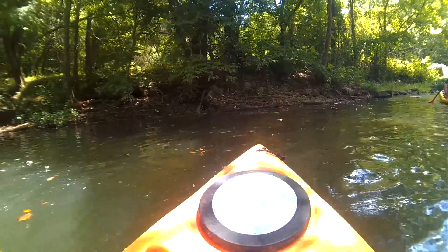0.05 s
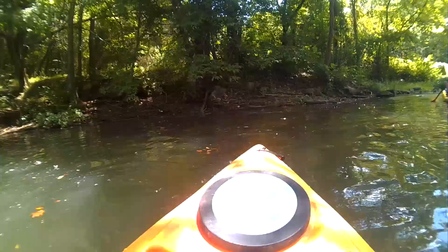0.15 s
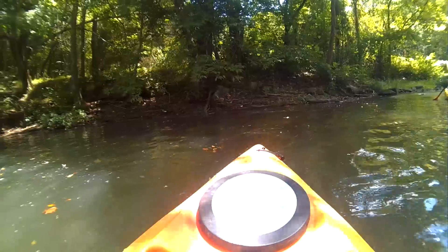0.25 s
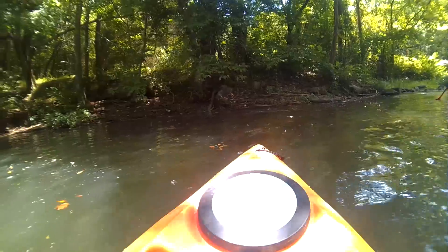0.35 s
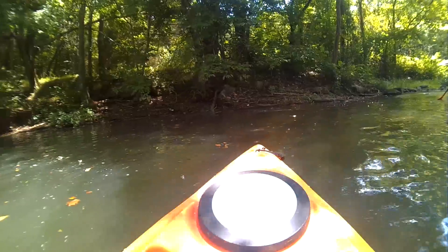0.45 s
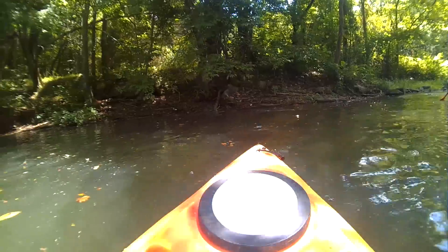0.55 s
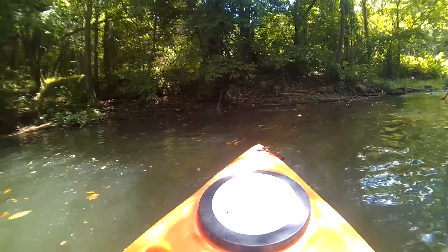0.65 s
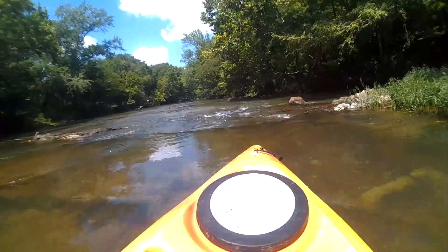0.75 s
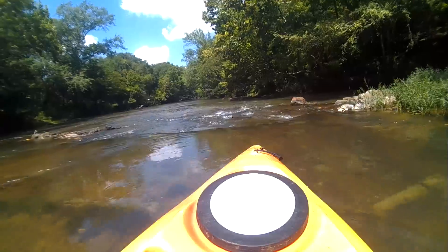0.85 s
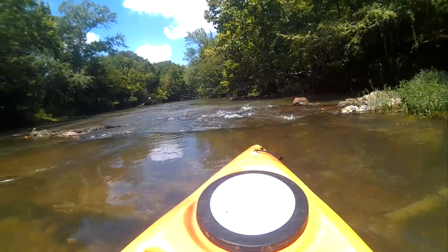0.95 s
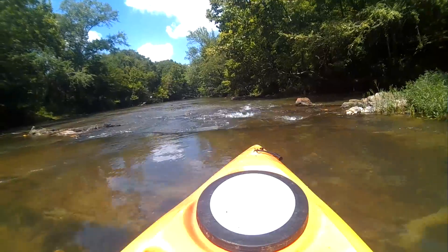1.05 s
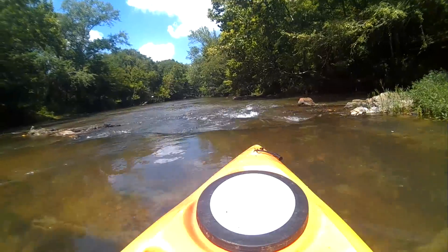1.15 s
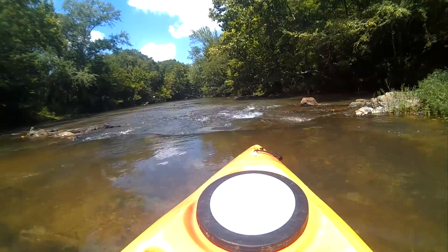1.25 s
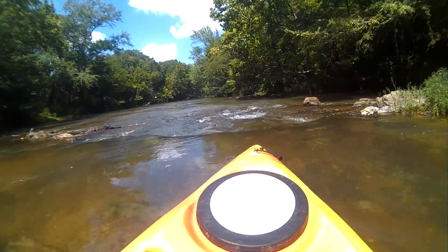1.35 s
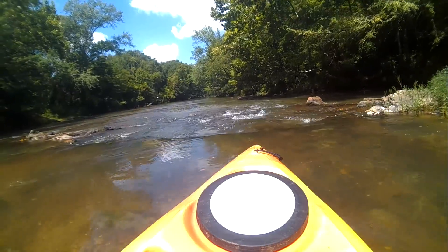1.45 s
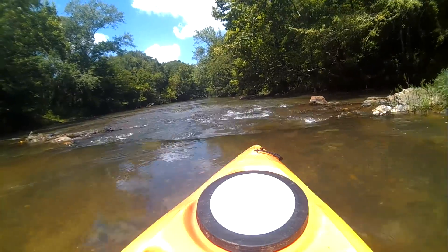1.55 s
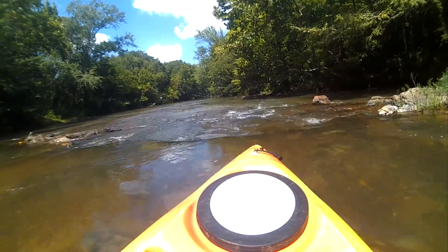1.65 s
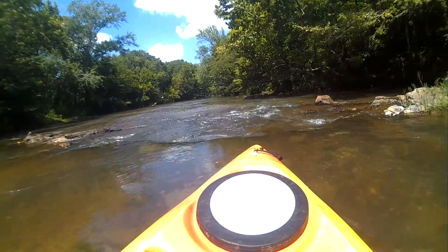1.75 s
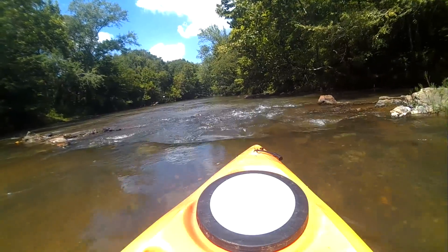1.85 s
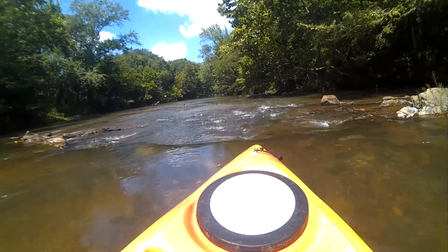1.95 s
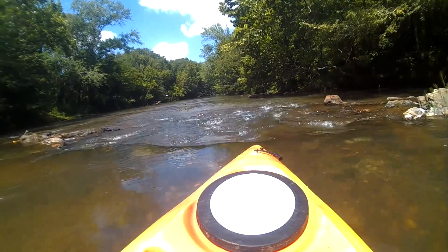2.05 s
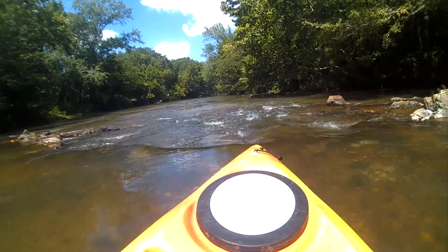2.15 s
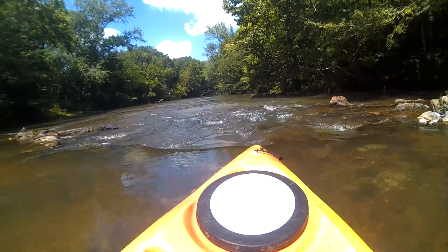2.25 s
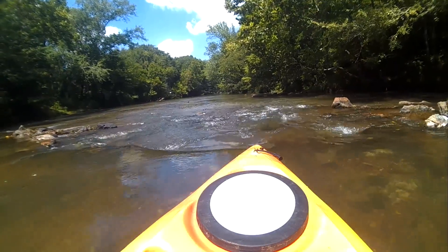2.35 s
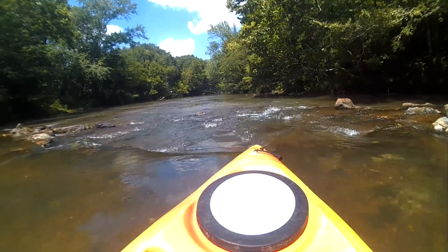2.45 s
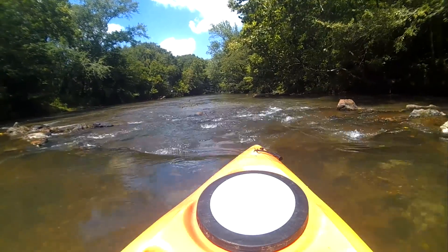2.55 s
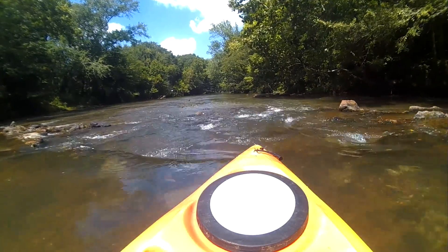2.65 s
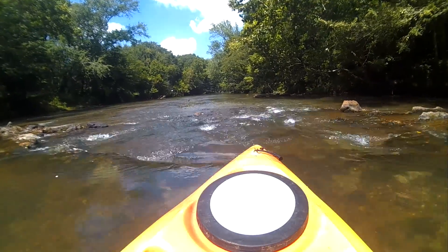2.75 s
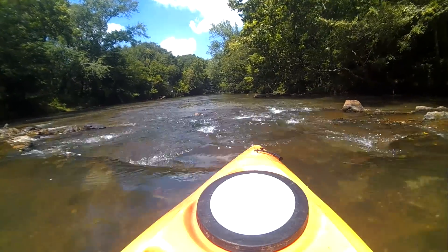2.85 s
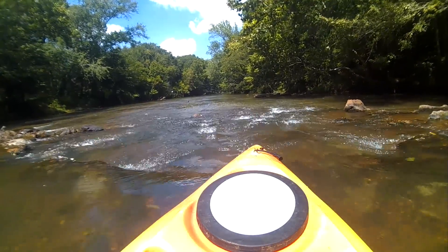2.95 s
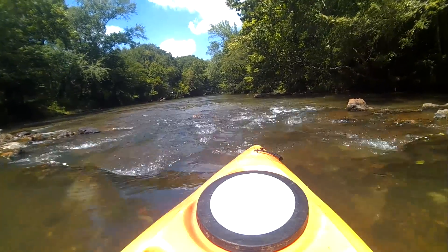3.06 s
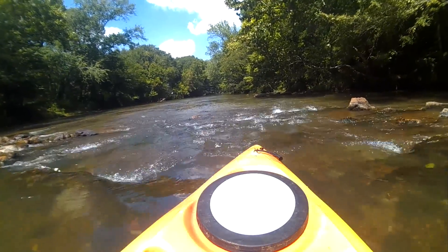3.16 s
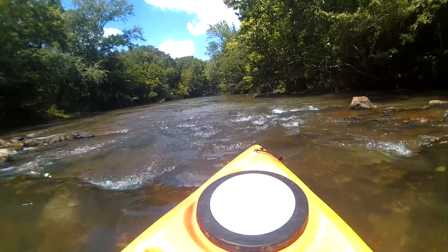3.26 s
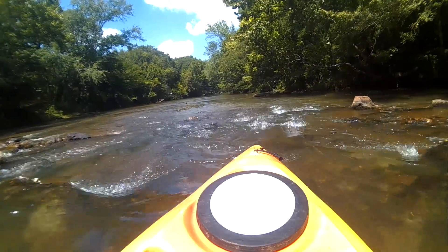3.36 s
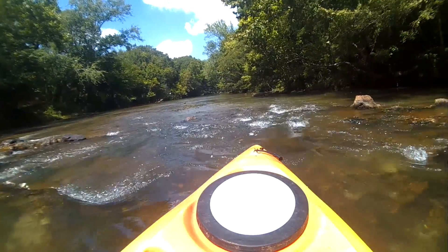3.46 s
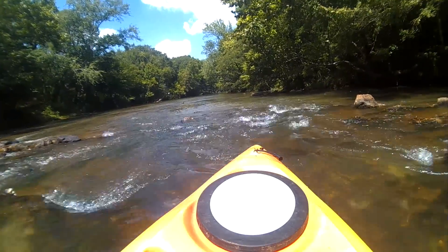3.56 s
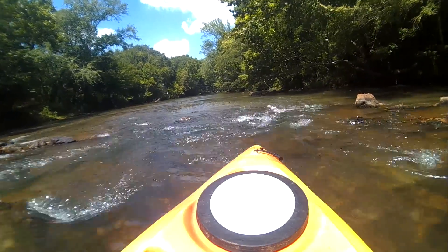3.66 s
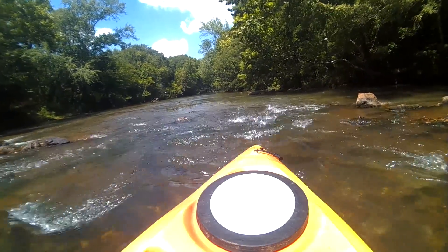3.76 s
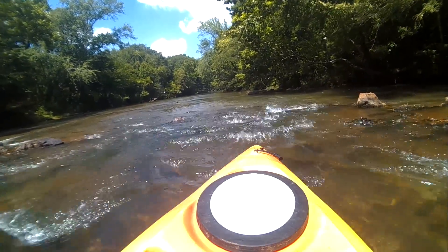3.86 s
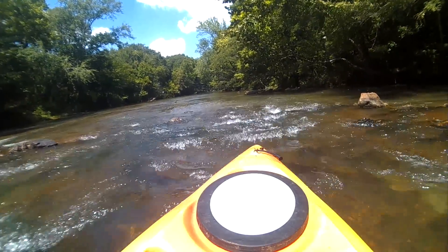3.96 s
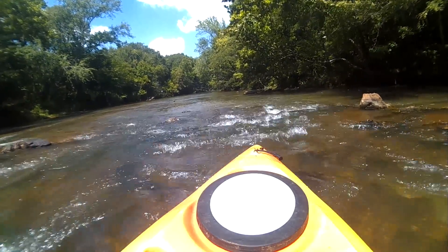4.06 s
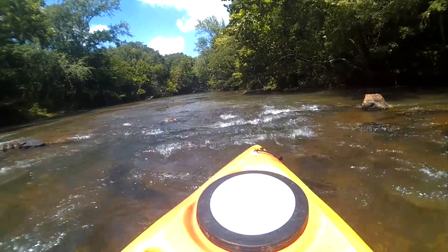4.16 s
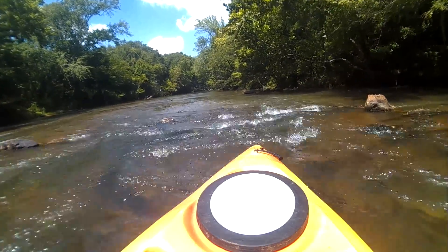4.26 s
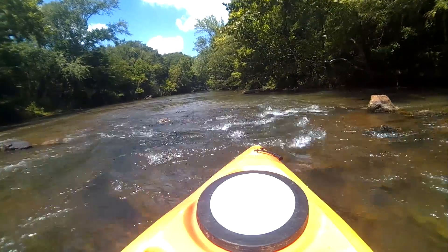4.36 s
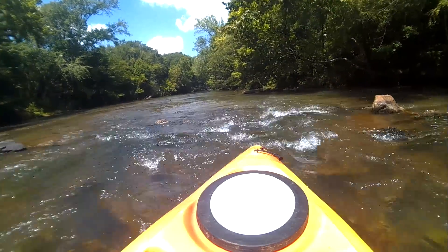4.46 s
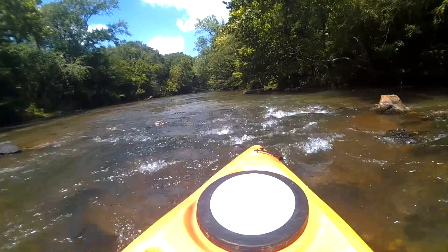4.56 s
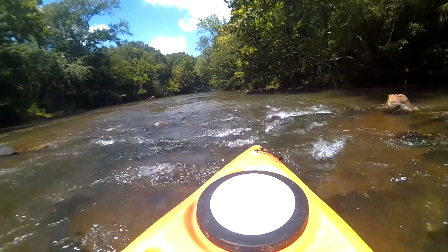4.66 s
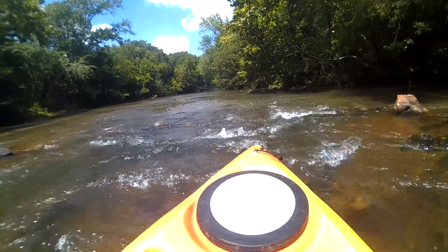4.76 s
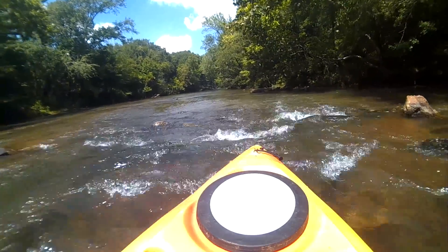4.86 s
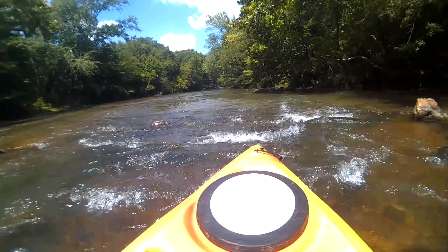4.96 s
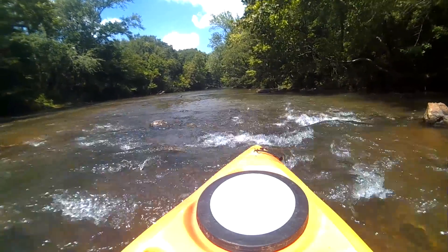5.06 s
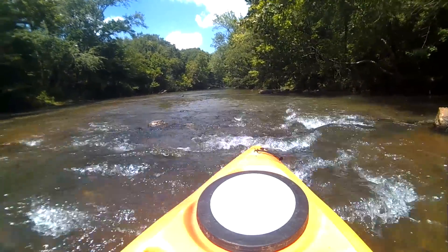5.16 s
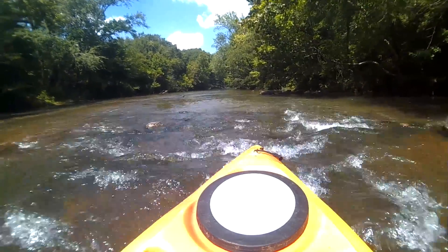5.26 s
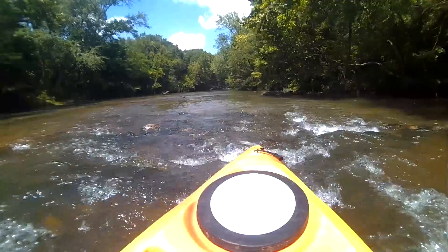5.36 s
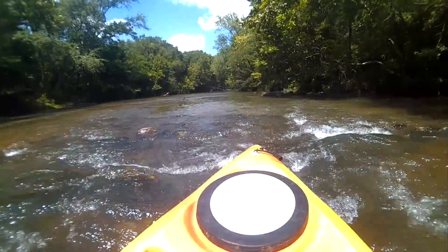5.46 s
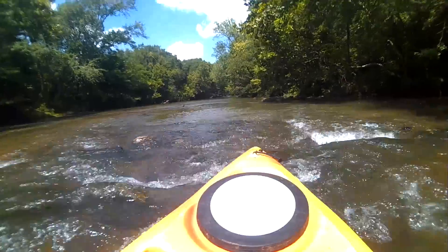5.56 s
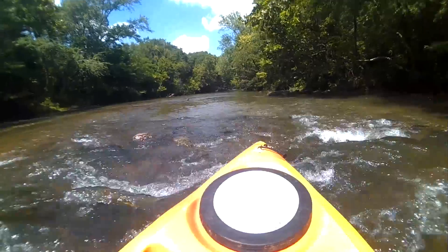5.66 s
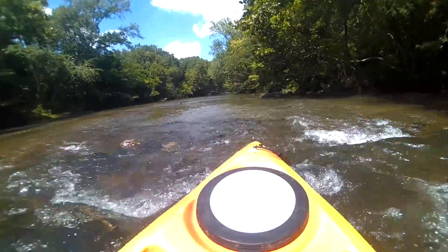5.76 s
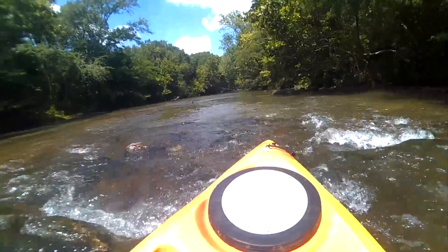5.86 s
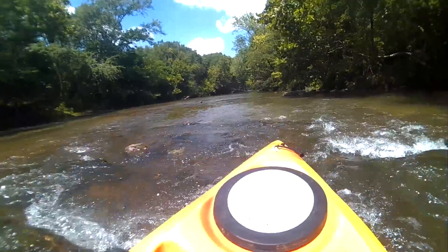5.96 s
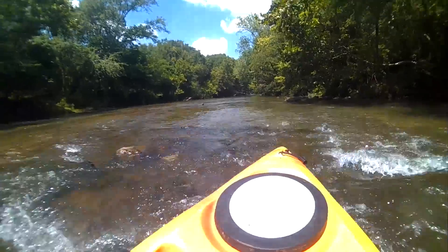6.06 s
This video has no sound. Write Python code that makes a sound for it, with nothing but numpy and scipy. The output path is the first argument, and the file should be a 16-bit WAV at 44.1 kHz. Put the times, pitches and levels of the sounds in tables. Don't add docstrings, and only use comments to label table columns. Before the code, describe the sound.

Quiet muffled creek water gurgles and laps under a plastic kayak, swelling into a riffle, then loud scraping knocks as the hull hits rock.

```python
import sys
import numpy as np
from scipy import signal
from scipy.fft import rfft, irfft, next_fast_len
from scipy.io import wavfile
from scipy.ndimage import uniform_filter1d, map_coordinates

SR = 44100
rng = np.random.default_rng(int(sys.argv[2]) if len(sys.argv) > 2 else 0)


def file_out(sig):
    cols = np.atleast_2d(sig).T
    lim = np.clip(cols, -1, 1)
    pcm = np.round(lim * 32767).astype(np.int16)
    wavfile.write(sys.argv[1], SR, pcm)


def nominal_scale(level):
    x = np.asarray(level, float) / 20
    return 10 ** x


N = 269451
T = np.arange(N) / SR

# freq_hz, density_db
HISS_SPECTRUM = [(20, 18), (60, 23), (300, 1), (3000, 7.5), (5300, -4), (6000, -19.5), (6900, -8),
                 (8000, -19), (9500, -7.5), (12500, -5), (14000, -4.5), (15600, -6.5), (16000, -37.5)]
# start_s, hiss_db, tones_db
NOISE_LEVELS = [
    (0, -76, 6),
    (.79, -77.5, 3),
    (5.36, -72.5, 0),
]
# pitch_hz, level_db
WHINE_TONES = [(14357, -104), (14449, -101), (14540, -107), (14626, -93), (14718, -96), (14809, -103)]
# time_s, level_db
CREEK_LEVEL = [(0, -60), (.09, -64), (.78, -64), (.81, -58), (1.1, -56), (1.77, -57), (2.5, -55.5),
               (3.7, -55), (3.85, -52.5), (4.3, -52.5), (4.8, -49.5), (4.9, -46), (5.15, -46.5),
               (5.34, -50)]
# start_s, peak_db, pitch_hz
NEAR_BUBBLES = [(0.3706, -47, 1250), (1.0894, -42, 1190), (1.4706, -43, 1360), (1.9974, -45, 1180),
                (2.4384, -42, 1270), (2.5975, -42, 1200), (2.617, -42, 1250), (2.9597, -42, 1210),
                (3.4406, -42, 1210), (3.7988, -43, 1230), (4.0292, -42, 1130), (4.157, -42, 1250),
                (4.2253, -41, 1230), (4.3236, -42, 1200), (4.5062, -39, 1340), (4.5351, -39, 1190),
                (4.6763, -39, 1240), (4.7012, -39, 1320), (4.7296, -38, 1210), (4.7651, -39, 1190),
                (4.8165, -38, 1220), (4.8389, -37, 1310), (4.9761, -34, 1210), (5.007, -33, 1230),
                (5.0564, -37, 1290), (5.1188, -33, 1180), (5.1422, -34, 1170), (5.2135, -37, 1220),
                (5.254, -37, 1200), (5.3278, -36, 1270)]
# centre_hz, width_hz, level_db
CASE_MODES = [(1232, 109, -0.5), (1990, 330, -15), (2682, 215, -9.5), (3120, 100, -19), (4360, 510, -17),
              (600, 900, -25.5)]
# freq_hz, gain_db
CASE_WALL = [(100, -7.5), (700, -1), (3300, -1), (4000, -13), (5200, -22.5), (6000, -36), (8000, -35.5),
             (12000, -25.5), (16000, -39.5)]
# centre_hz, width_hz, level_db
HULL_MODES = [(61, 18, 0), (148, 25, -13)]
# centre_hz, width_hz, level_db
PANEL_MODES = [(299.6, 26, -0.5), (238, 63, -5.5), (427.7, 21, -6), (413, 19, -21), (575.6, 38, -6)]
# start_s, hold_s, hull_db, panels_over_hull_db
WAVE_SURGES = [(.07, .06, -75, -14), (.26, .03, -73, -12), (.4, .04, -68, -16), (.47, .04, -72, -10),
               (.55, .04, -76, -10), (1.335, .08, -61, -6), (1.47, .04, -65, -10), (1.54, .02, -72, -18),
               (3.265, .03, -58, -17), (3.33, .2, -74, -12), (3.72, .3, -73, -14), (4.08, .05, -66, -12),
               (4.23, .05, -68, -12), (4.31, .15, -74, -5), (4.585, .08, -58, -24), (4.71, .08, -62, -14),
               (4.79, .03, -58, -9), (4.87, .1, -68, -3), (5.0, .05, -62, -3), (5.1, .03, -55, -10),
               (5.17, .05, -52, -14), (5.25, .1, -55, -5)]
# start_s, peak_db, pitch_hz, t60_s
WAVELETS = [(0.077, -63, 513, 0.12), (0.344, -63, 400, 0.08), (1.174, -60, 692, 0.073),
            (1.216, -71, 600, 0.08), (1.34, -64, 425, .6), (1.34, -63, 240, .5), (1.345, -60, 302, .3),
            (1.42, -58, 305, .4), (.21, -66, 145, .3), (.22, -57, 2300, .06), (.36, -62, 150, .2),
            (2.539, -66, 619, 0.08), (3.268, -70, 250, 0.08), (3.946, -52, 560, 0.08),
            (4.232, -74, 560, 0.07), (4.362, -49, 538, 0.065), (4.624, -57, 296, 0.094),
            (4.722, -49.5, 296, 0.24), (4.885, -40, 480, 0.054), (4.961, -45.5, 533, 0.17),
            (5.104, -50.5, 300, 0.24), (4.975, -50, 290, .08), (4.99, -50, 400, .14),
            (5.225, -48, 600, .07), (5.28, -48, 590, .07)]
# centre_hz, width_hz, level_db
DECK_MODES = [(309, 54, -13.5), (400, 25, -13.5), (553, 38, -10), (630, 21, -14.5), (866, 40, -13),
              (1290, 230, -3.5), (1965, 100, -4.5), (2190, 68, -1), (2637, 59, -7.5), (2980, 250, -16.5),
              (3810, 90, -19), (4690, 200, -38)]
# centre_hz, width_hz, level_db
STONE_MODES = [(60, 35, -5), (110, 23, -2), (200, 90, -7)]
# time_s, pressure_db
GRIND_PRESSURE = [
    (5.34, -64),
    (5.36, -32),
    (5.41, -27),
    (5.47, -37),
    (5.53, -31),
    (5.575, -33),
    (5.6, -45),
    (5.645, -32),
    (5.665, -50),
]
# time_s, pressure_db
SLIDE_PRESSURE = [
    (5.645, -60),
    (5.665, -40),
    (5.81, -41),
    (5.88, -44),
    (5.93, -41),
    (6.0, -37),
    (6.11, -32.5),
]
# start_s, peak_db, brightness_db
ROCK_BLOWS = [(5.3575, -20, -9), (5.366, -21, -5), (5.3785, -4, -5), (5.382, 0, -12), (5.3905, -4, -8),
              (5.3955, -10, -8), (5.398, -8, -14), (5.4045, -10, -5), (5.408, -11, -11), (5.4155, -18, -7),
              (5.4535, -17, -6), (5.4635, -19, -8), (5.5135, -14, -10), (5.5435, -13, -6),
              (5.548, -10, -10), (5.552, -11, -10), (5.5625, -3, -18), (5.571, -13, -12), (5.622, -25, -6),
              (5.6375, -7, -8), (5.646, -11, -9), (5.761, -18, -7), (5.799, -15, -6), (5.806, -19, -8),
              (5.812, -22, -12), (5.9155, -9, -18), (5.929, -25, -10)]
# start_s, swings_gained (while the hull is taut)
ROCK_SHOVES = [
    (5.3543, .6),
    (5.5524, .34),
]
# time_s, swing_db
SWING_LEVEL = [
    (5.354, -14),
    (5.385, .3),
    (5.435, 5),
    (5.53, 3.5),
    (5.57, 1.5),
    (5.63, .8),
    (5.76, -6),
    (5.795, -17),
    (6.11, -19),
]


def unit(x):
    return x / np.sqrt(np.mean(x ** 2) + 1e-20)


def curves(rows, outside=None):
    s, *columns = np.transpose(rows)
    return [np.interp(T, s, column, outside, outside) for column in columns]


def along(points, hz):
    f, db = np.transpose(points)
    return nominal_scale(np.interp(np.log(hz + 1), np.log(f + 1), db))


def peaks(modes, hz):
    power = 0
    for centre, width, db in modes:
        damping = (hz * width) ** 2
        power = power + nominal_scale(db) ** 2 * damping / ((centre * centre - hz * hz) ** 2 + damping)
    return np.sqrt(power)


def below(hz, edge_hz):
    return 1 / (1 + (hz / edge_hz) ** 4)


def coloured(x, gain):
    m = 2 * next_fast_len(N // 2 + SR // 4)
    g = gain(np.fft.rfftfreq(m, 1 / SR))
    cepstrum = irfft(np.log(unit(g) + 1e-6), m)
    cepstrum = np.r_[cepstrum[0], 2 * cepstrum[1:m // 2], np.zeros(m // 2)]
    return irfft(rfft(x, m) * np.exp(rfft(cepstrum)), m)[..., :N]


def wobble(rate):
    return map_coordinates(rng.standard_normal(int(N * rate / SR) + 4), [T * rate])


def unsteady(hz, stray):
    pitch_hz = hz * (1 + stray * wobble(25))
    return np.sqrt(2) * np.sin(2 * np.pi * np.cumsum(pitch_hz) / SR)


def electronics():
    hiss = unit(coloured(rng.standard_normal(N), lambda hz: along(HISS_SPECTRUM, hz)))
    tones = np.zeros(N)
    for hz, db in WHINE_TONES:
        tones += np.sqrt(2) * nominal_scale(db) * np.sin(2 * np.pi * (hz * T + rng.random()))
    s, hiss_db, tones_db = np.transpose(NOISE_LEVELS)
    now = np.searchsorted(s[1:], T)
    return nominal_scale(hiss_db[now] + 2.0 * wobble(170)) * hiss + nominal_scale(tones_db[now]) * tones


def bubbles(s, hz, cycles, size, rise):
    t = np.arange(SR // 40) / SR
    u = t * (hz / cycles)[:, None]
    envelope = size[:, None] * u * np.exp(1 - u)
    wave = envelope * np.sin(2 * np.pi * hz[:, None] * t * (1 + rise * u))
    at = (s * SR).astype(int)[:, None] + np.arange(len(t))
    return np.bincount(at.ravel(), wave.ravel(), N + SR)[:N]


def creek(count=3600):
    spray_db, spray_s = 2, .012
    when, pitch, size = rng.random(count), rng.standard_normal(count), rng.exponential(size=count)
    pitch_hz = np.clip(1800 * np.exp(.4 * pitch), 900, 6000)
    swarm = bubbles(when * N / SR, pitch_hz, 1.42, nominal_scale(1.21 * np.minimum(size, 3)), 0.024)
    rush = nominal_scale(0.92 * wobble(60)) * rng.standard_normal(N)
    water = rush + nominal_scale(-12.5) * unit(swarm)
    muffled = unit(coloured(water, lambda hz: peaks(CASE_MODES, hz) * along(CASE_WALL, hz)))
    s, db, hz = np.transpose(NEAR_BUBBLES)
    near = bubbles(s - .001, hz, 3, nominal_scale(db - 6), .01)
    spray = np.bincount((s * SR).astype(int), minlength=N)
    spray = signal.fftconvolve(spray, np.exp(-(T[:SR // 10] / spray_s - 1) ** 2))[:N]
    level_db, = curves(CREEK_LEVEL)
    return nominal_scale(level_db + spray_db * spray) * muffled + near


def surges():
    calm_keel_db, calm_panel_db, creek_share = -93, -78.5, .35
    attack_s, t60_s, flutter_db = .006, .13, 2.5
    creek_db, = curves(CREEK_LEVEL)
    calm_db = creek_share * (creek_db - creek_db.mean())
    keel = nominal_scale(calm_keel_db + calm_db + 4 * wobble(8))
    panel = nominal_scale(calm_panel_db + calm_db + 1.5 * wobble(12))
    t = T[:SR // 2]
    for s, hold, db, panel_db in WAVE_SURGES:
        wave = np.minimum(t / attack_s, 1) * nominal_scale(db - 60 * np.maximum(t - hold, 0) / t60_s)
        start = round(s * SR)
        keel[start:][:len(t)] += wave
        panel[start:][:len(t)] += nominal_scale(panel_db - 4) * wave
    return keel * nominal_scale(flutter_db * wobble(22)), panel * nominal_scale(flutter_db * wobble(22))


def hull():
    keel_gain, panel_gain = surges()
    shake = rng.standard_normal((2, N))
    keel = nominal_scale(-9) * unit(coloured(shake[0], lambda hz: peaks(HULL_MODES, hz)))
    for hz, _, db in HULL_MODES:
        keel = keel + nominal_scale(db) * unsteady(hz, stray=.07)
    keel = nominal_scale(-2) * keel_gain * keel

    panels = unit(coloured(shake[1], lambda hz: (peaks(PANEL_MODES, hz) + nominal_scale(-8.5)) / (1 + (hz / 800) ** 3)))
    tones = np.zeros(N)
    for hz, _, db in PANEL_MODES:
        tones += nominal_scale(db + 3.7 * wobble(5.1)) * unsteady(hz, stray=0.01525)
    panels = panel_gain * nominal_scale(-3.5) * (panels + nominal_scale(-6) * unit(tones))

    t = T[:SR // 2]
    for s, db, hz, t60 in WAVELETS:
        envelope = nominal_scale(db - 4 - 60 * np.minimum(t / t60, 5)) * (1 - np.exp(-t / .004))
        panels[round(s * SR):][:len(t)] += envelope * np.sin(2 * np.pi * hz * t)
    return keel + panels


def deck(hz):
    return peaks(DECK_MODES, hz) * along(CASE_WALL, hz)


def low(hz):
    return deck(hz) * below(hz, 1350)


def high(hz):
    return deck(hz) * (1 - below(hz, 1200))


def patchy(rows, depth_db):
    z = signal.stft(rng.standard_normal((rows, N)), nperseg=512)[2]
    field = uniform_filter1d(rng.standard_normal(z.shape[1:]), size=4, axis=0)
    field = uniform_filter1d(field, size=7, axis=1)
    return signal.istft(z * nominal_scale(depth_db * unit(field)), nperseg=512)[1][:, :N]


def scrape(body_follows):
    grit = patchy(4, depth_db=3.3) * nominal_scale(1.6 * wobble(150))
    layers = [unit(coloured(grit[0], lambda hz: low(hz) * (1 - below(hz, 800)))),
              unit(coloured(grit[1], high)),
              unit(coloured(grit[2], lambda hz: deck(hz) * below(hz, 650))),
              unit(coloured(grit[3], lambda hz: peaks(STONE_MODES, hz) * below(hz, 200)))]
    gains = np.zeros((4, N))
    # stroke, panel_db, keel_db, bright_db
    strokes = (GRIND_PRESSURE, -.5, 5, -7), (SLIDE_PRESSURE, 1, -1.5, 1)
    for stroke, panel_db, keel_db, bright_db in strokes:
        level_db, = curves(stroke, -120)
        body_db = (body_follows - 1) * (np.maximum(level_db, -50) + 38)
        tone_db = [0 * T, bright_db + .8 * body_db, panel_db + body_db, keel_db + body_db]
        gains += nominal_scale(level_db + tone_db)
    return np.sum(gains * layers, axis=0)


def rock():
    body_follows = .6
    knock_t60_s, softer_s_per_db, duller_s_per_db = .006, .00025, .0004
    tick_db, tick_grows, tick_t60_s = -14, 3, .004
    thump_db, thump_t60_s = -15, .07
    blows, t = np.zeros(N + SR), np.arange(SR // 20) / SR
    impulse = 1. * (T == 0)
    dull = coloured(impulse, lambda hz: low(hz) * (1 - below(hz, 780)))[:len(t)]
    sharp = coloured(impulse, high)[:len(t)]
    boom = coloured(impulse, lambda hz: deck(hz) * below(hz, 650) + nominal_scale(-8) * peaks(STONE_MODES, hz))[:len(t)]
    for s, db, sharp_db in ROCK_BLOWS:
        t60 = knock_t60_s - softer_s_per_db * db - duller_s_per_db * sharp_db
        burst = rng.standard_normal(len(t)) * nominal_scale(-60 * t / t60) * (1 - np.exp(-10 * t / t60))
        ring = signal.fftconvolve(burst, dull + nominal_scale(sharp_db + 5) * sharp)[:len(t)]
        ring = ring * nominal_scale(-60 * t / (4 * t60))
        edge = np.diff(np.diff(rng.standard_normal(len(t) + 2)))
        tick = nominal_scale(tick_db + tick_grows * db + .7 * sharp_db - 60 * t / tick_t60_s) * edge
        thump = signal.fftconvolve(burst, boom)[:len(t)] * nominal_scale(-60 * t / thump_t60_s)
        thump = nominal_scale(thump_db + body_follows * db) * thump / np.abs(thump).max()
        blows[round(s * SR):][:len(t)] += nominal_scale(db) * ring / np.abs(ring).max() + tick + thump
    return scrape(body_follows) + blows[:N]


def swing():
    swing_hz, taut_s, handover_s = 50, .036, .011
    rough_db = 3
    travel = np.zeros(N)
    for s, gained in ROCK_SHOVES:
        t = np.maximum(T - .0025 - s, -handover_s)
        share = np.clip(t / handover_s + 1, 0, 1)
        cycles = swing_hz * t + gained * (1 - np.exp(-t / taut_s))
        travel = (1 - share) * travel + share * np.sin(2 * np.pi * cycles)
    level_db, = curves(SWING_LEVEL)
    dying = np.clip(-level_db / 10, 0, 1)
    return nominal_scale(level_db + rough_db * dying * wobble(30)) * travel


def capsule(sound, travel):
    free = uniform_filter1d(1. * (np.abs(travel) < 1), size=13)
    held = uniform_filter1d(np.clip(travel, -1, 1), size=13)
    held = held + np.gradient(held) * SR / (2 * np.pi * 120)
    sag = signal.butter(1, 26 / (SR / 2), "high")
    x = free * sound + nominal_scale(-20.5) * signal.lfilter(*sag, held)
    x = x / (1 + np.abs(x / .9) ** 6) ** (1 / 6)
    port = signal.butter(8, 4800 / (SR / 2), output="sos")
    window = signal.butter(2, [9000 / (SR / 2), 14500 / (SR / 2)], "band", output="sos")
    return signal.sosfilt(port, x) + nominal_scale(-21) * signal.sosfilt(window, x)


def scene():
    sound = creek() + hull() + rock()
    return (capsule(sound, swing()) + electronics())[None]


def low_pass(x):
    return signal.sosfilt(signal.butter(12, 15750, fs=SR, output="sos"), x)


def record(dry):
    return low_pass(dry)


dry = scene()
out = record(dry)
file_out(out)
```